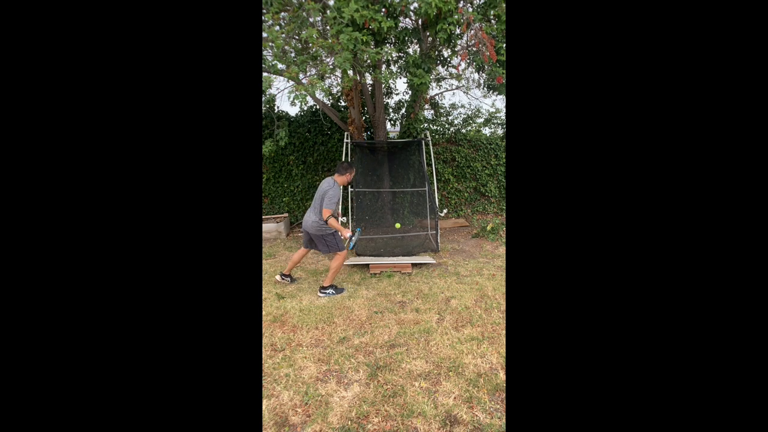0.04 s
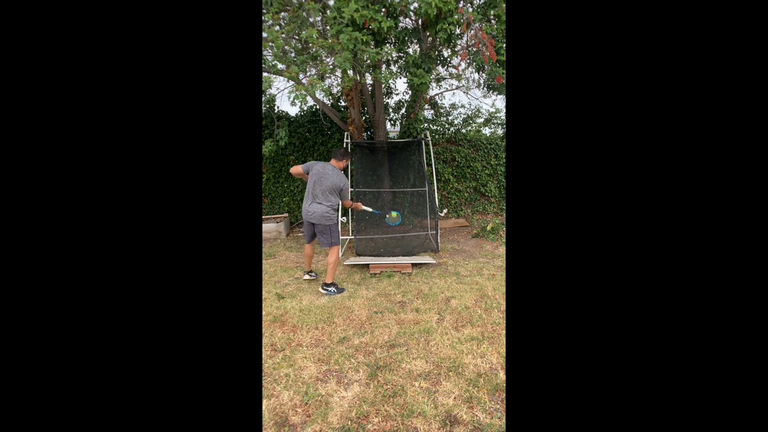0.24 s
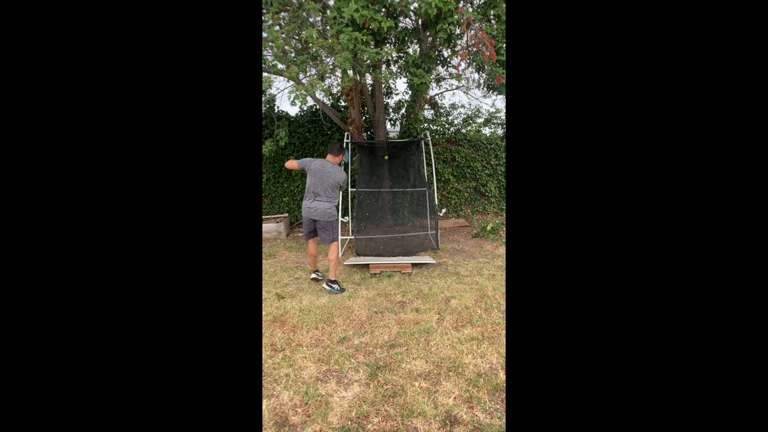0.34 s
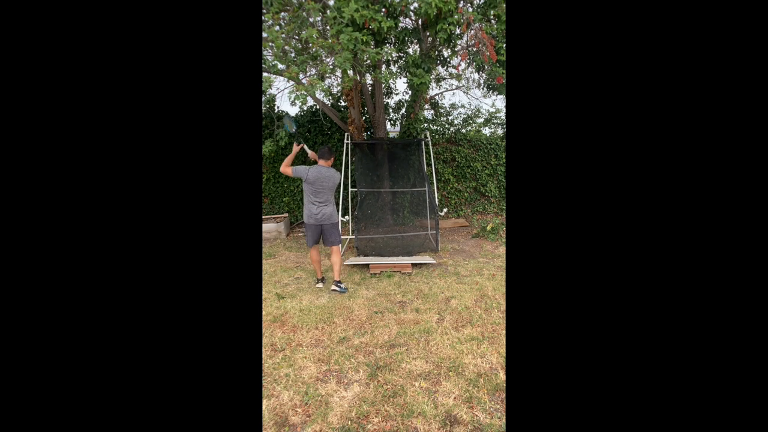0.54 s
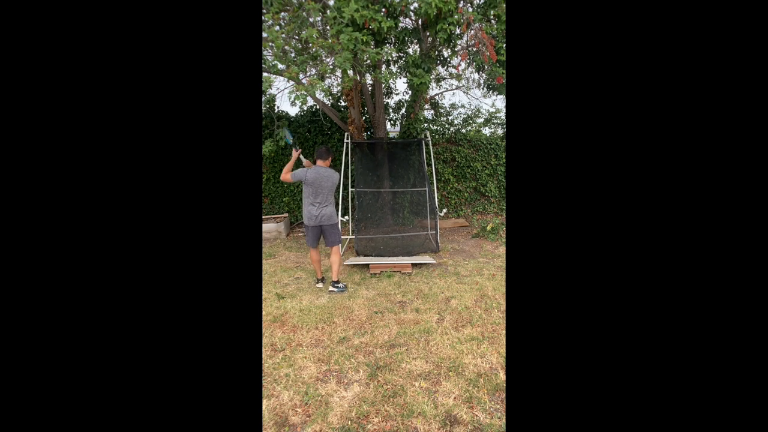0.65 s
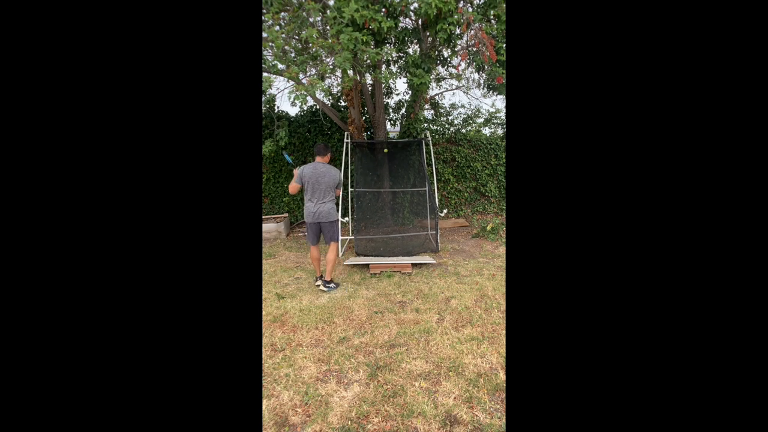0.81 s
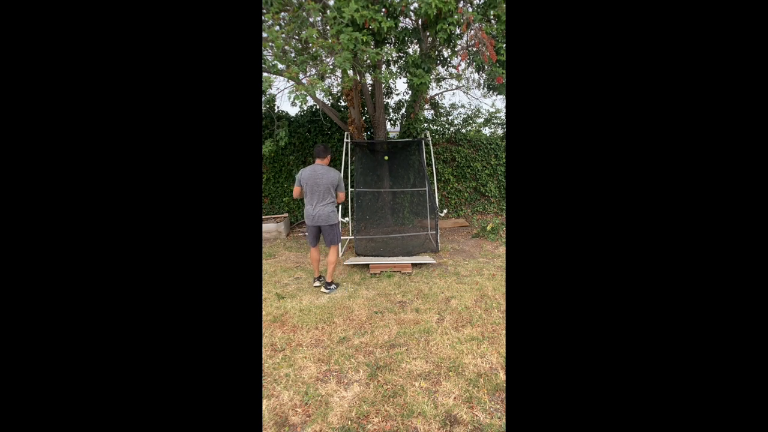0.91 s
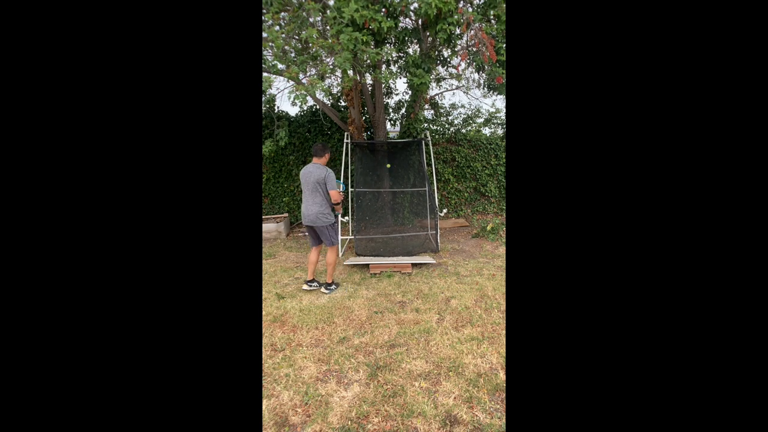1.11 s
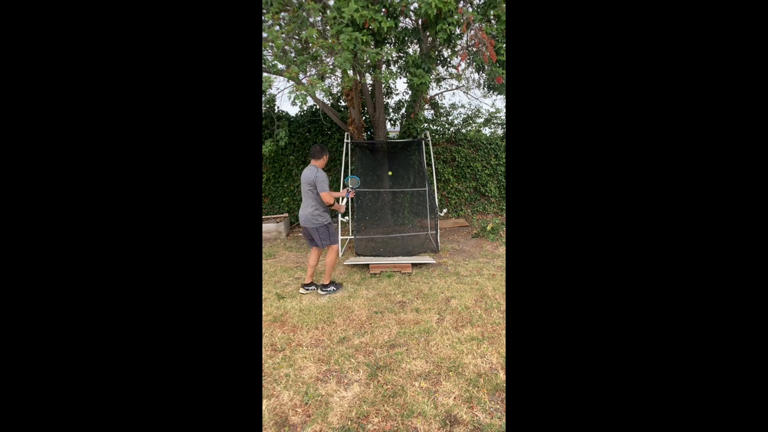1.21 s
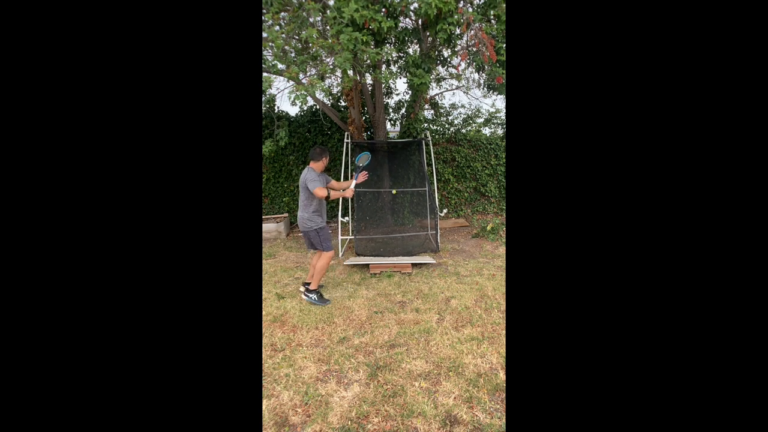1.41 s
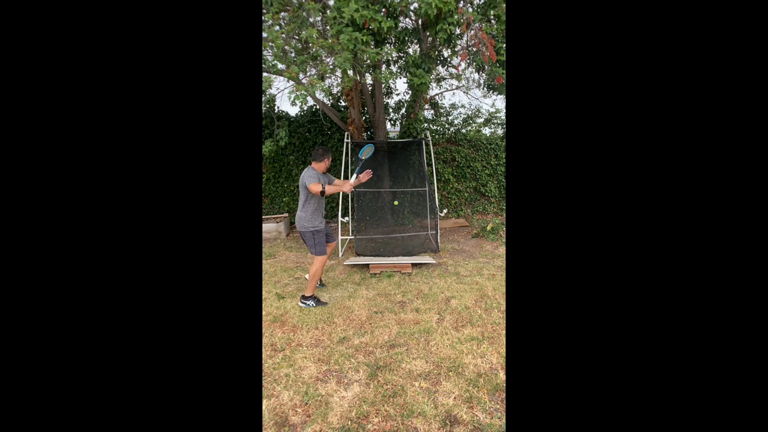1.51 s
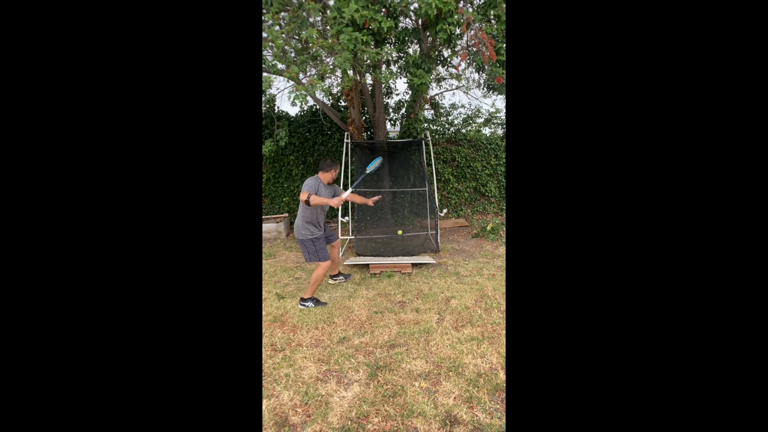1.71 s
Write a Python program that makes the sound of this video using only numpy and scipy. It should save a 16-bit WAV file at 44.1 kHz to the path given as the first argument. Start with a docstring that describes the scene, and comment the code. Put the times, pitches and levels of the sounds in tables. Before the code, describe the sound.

A racket hits a ball once with a sharp pock outdoors, over a low rumble.

```python
"""Racket stroke into a back-yard net

A ball is driven into a practice net a few metres away. The strings pock and ring;
walls, fence and ground echo the blow, hedge and tree scatter it. The net takes the ball
with a tick and a low thump. Shoes shuffle on dry grass. A steady low rumble lies
underneath; a thin, insect-like hiss comes and goes."""
import sys
import numpy as np
from scipy import signal
from scipy.fft import rfft, irfft
from scipy.io import wavfile

SR = 44100
rng = np.random.default_rng(int(sys.argv[2]) if len(sys.argv) > 2 else 0)


def store_pcm(level_fs):
    """Save levels as 16-bit WAV."""
    pcm = np.round(np.clip(level_fs, -1, 1) * 32767).astype(np.int16)
    wavfile.write(sys.argv[1], SR, np.atleast_2d(pcm).T)


N = 77175
T_S, F_HZ = np.arange(N) / SR, np.fft.rfftfreq(N, 1 / SR)
HIT_S, CRACK_S = .2025, .2032

# Stereo width: f/Hz, side over mid/dB
STEREO_WIDTH = [(60, -51.5), (400, -45), (700, -17), (1200, 1), (1800, 5.5), (2500, 2), (4400, 3),
                (6800, 5.5), (8200, -20.5), (11000, 14), (15000, -2.5)]
# Low rumble: f/Hz, relative density/dB
RUMBLE_SPECTRUM = [(15, -55), (25, -23.5), (40, -7.5), (64, -0.5), (114, 1.5), (145, -7), (212, -11),
                   (296, -6.5), (326, -7.5), (400, -11.5), (550, -13.5), (604, -10.5), (715, -15),
                   (815, -19), (947, -15.5), (1120, -31.5), (1460, -50.5), (1630, -56.5), (2200, -64),
                   (2860, -82), (4840, -120)]
# High air: f/Hz, relative density/dB
AIR_SPECTRUM = [(1000, -19), (3000, -18.5), (5500, -21), (6800, -26), (8300, 4), (9300, -18),
                (10500, -25.5), (11600, -35), (13500, -18.5), (16000, -36)]
# Thin hiss: f/Hz, relative density/dB
HISS_SPECTRUM = [(4500, -29), (5800, -19), (6600, 3), (7200, -10), (8000, 5.5), (8700, -10.5), (9300, -31),
                 (16000, -67)]
# Hiss envelope: t/s, level/dB
HISS_ENVELOPE = [(0, -83), (.06, -64.5), (.15, -59.5), (.3, -62.5), (.52, -60), (.585, -76), (.7, -100),
                 (1.1, -100), (1.2, -74), (1.31, -74.5), (1.37, -100)]
# Ball on strings: f/Hz, relative density/dB
BLOW_SPECTRUM = [(30, -39), (70, -1), (130, -4.5), (220, -1), (300, -4), (400, 3.5), (520, 7), (610, 3),
                 (700, -9.5), (800, -35), (920, -6.5), (1250, -4.5), (1500, -22.5), (1800, -17),
                 (2200, -51), (3000, -67), (16000, -91)]
# Group delay of the blow, bass last: f/Hz, delay/s
BLOW_DELAY = [(60, 0.0223), (130, 0.0142), (250, 0.01023), (500, 0.00693), (950, 0.00529), (1400, .0027),
              (3000, .002)]
# Modes of ball, strings and frame: f/Hz, level/dB, t60/s
RACKET_MODES = [(131.5, -66, .2), (175, -28.5, 0.0363), (365.6, -34.5, .17), (451.7, -38, .15),
                (526, -33.5, 0.18), (572.7, -43, 0.41), (921.7, -38, 0.13), (952.3, -18.5, 0.038),
                (971, -38, 0.195), (1031, -31.5, 0.181), (1229, -42.5, .16), (1570, -48, 0.16),
                (1695, -61, 0.12), (1745, -53, .12), (4140, -54.5, .08), (8110, -38, .018)]
# Balance of blow and modes: f/Hz, left minus right/dB
POCK_BALANCE = [(500, 0), (700, -5.7), (950, -0.8), (1300, 8.4), (1800, 0.5), (2400, 1), (4000, -1)]
# First contact: f/Hz, relative density/dB
CRACK_SPECTRUM = [(600, -25), (1500, -7), (2250, -36), (2800, -2), (3300, -7.5), (4150, -12.5), (4750, -12),
                  (5600, -54), (6700, -14.5), (7250, -12.5), (8200, 10), (8900, -13.5), (10000, -5.5),
                  (11500, -47), (13000, -18.5), (16000, -28.5)]
# Reflections off ground, fence, walls: delay/s, gain before colouring/dB, pan (+ left)
ECHO_PATHS = [(.0055, -16, .2), (.015, -18, -0.32), (0.0212, -22, 0.36), (0.0394, -14.5, -0.16),
              (0.043, -15.5, .2), (0.0533, -15, .1), (.061, -25.5, -.1), (0.07, -26.5, .1),
              (.084, -30.5, -.1), (.104, -24, .1)]
# Colouring of all reflections: f/Hz, gain/dB
ECHO_RESPONSE = [(60, -13), (170, -11), (300, 1), (500, -7.5), (750, 3.5), (980, 8.5), (1350, -11),
                 (3000, -6.5), (16000, -12)]
# Hedge and tree scatter: f/Hz, relative density/dB
SCATTER_SPECTRUM = [(50, -6.5), (150, 10.5), (550, -19.5), (740, -1.5), (950, -4), (1400, -24.5),
                    (1800, -18), (2200, -31), (3200, -30.5), (4300, -27), (5400, -33), (6700, -32),
                    (7200, -30), (8100, -15.5), (9000, -26.5), (10200, -32), (11600, -57.5), (14500, -39),
                    (16000, -42)]
# Scatter decay: f/Hz, t60/s
SCATTER_DECAY = [(100, 0.7), (500, 0.19), (950, 0.98), (2000, 0.41), (4000, 0.78), (8000, 0.32),
                 (15000, .6)]
# Net mesh: f/Hz, relative density/dB
MESH_SPECTRUM = [(1500, -28), (3500, -21.5), (5500, -28), (7200, -16.5), (7950, 0.5), (8800, -10),
                 (10200, -17.5), (11500, -37), (13000, -33), (14700, -25), (16000, -21)]
# Steps on grass: peak t/s, rise/s, level/dB, t60/s
GRASS_STEPS = [(.66, 0.07, -66.5, 0.75), (0.777, 0.037, -59, 0.48), (1.101, 0.023, -68, .3),
               (1.165, 0.03, -57.5, 0.23), (1.406, 0.013, -62, 0.55), (1.51, .08, -72.5, 0.32),
               (1.585, 0.045, -69.5, 0.23), (1.745, 0.061, -67.5, 0.38)]
# Dry blades: f/Hz, relative density/dB
GRASS_SPECTRUM = [(1000, -28.5), (2500, -32), (4400, -36), (5300, -48), (6500, -15.5), (7200, -14),
                  (8200, 4), (9000, -7.5), (10200, -13.5), (11600, -33), (13300, -23), (16000, -27)]
# Sole and clothing scuffs: peak t/s, rise/s, level/dB, t60/s, centre f/Hz, width/oct
SCUFF_EVENTS = [(.597, .003, -63, 0.046, 4190, 0.054), (0.596, 0.0061, -74, 0.074, 1690, 0.22),
                (0.784, .035, -68, 0.26, 3980, 0.45), (0.782, 0.029, -73, 0.086, 1573, 0.21),
                (1.004, 0.0022, -62, 0.019, 8270, 0.09), (1.14, .012, -76.5, .08, 4400, .25),
                (1.152, 0.026, -56.5, .2, 880, 0.14), (1.17, 0.039, -69, .22, 14160, 0.19),
                (1.37, 0.017, -55, 0.17, 934, .1)]


def amp(db):
    """dB to gain."""
    return 10 ** (np.asarray(db) / 20)


def unit_rms(x):
    """Scale to rms 1."""
    return x / np.sqrt(np.mean(x ** 2) + 1e-20)


def curve(points, at_hz=F_HZ):
    """Interpolate a table over log frequency."""
    hz, value = np.transpose(points)
    return np.interp(np.log(at_hz + 1), np.log(hz + 1), value)


def noise(shape_db):
    """Shaped stereo noise, rms 1: mono bass, wide treble."""
    mid, side = rfft(rng.standard_normal((2, N))) * amp(shape_db)
    side = side * amp(curve(STEREO_WIDTH))
    return unit_rms(irfft(np.array([mid + side, mid - side]), N))


def swell(peak_s, rise_s, t60_s):
    """Gaussian rise, exponential fall."""
    age_s = T_S - peak_s
    return np.exp(-(np.minimum(age_s, 0) / rise_s) ** 2) * amp(-60 * np.maximum(age_s, 0) / t60_s)


def ripple_db(depth_db=3.2, spacing_hz=130, above_hz=1400):
    """Many small resonances: random spectral peaks and dips."""
    knots_hz = np.arange(0, SR / 2, spacing_hz)
    return depth_db * np.interp(F_HZ, knots_hz, rng.standard_normal(len(knots_hz))) * (F_HZ > above_hz)


def rumble(level_db=-51.5, split_hz=390, flutter_db=2.36, flutter_hz=18, fade_db_per_s=1.5):
    """Low rumble: the bass wavers, the upper band slowly fades."""
    flutter = unit_rms(irfft(rfft(rng.standard_normal(N)) * (F_HZ < flutter_hz), N))
    wash = amp(level_db) * noise(curve(RUMBLE_SPECTRUM))
    bass = irfft(rfft(wash) / (1 + (F_HZ / split_hz) ** 4), N)
    upper = (wash - bass) * amp(.5 - fade_db_per_s * T_S)
    return bass * unit_rms(amp(flutter_db * flutter)) + upper


def air(level_db=-77):
    """Faint, steady high noise."""
    return amp(level_db) * noise(curve(AIR_SPECTRUM))


def hiss():
    """Insect-like hiss that comes and goes."""
    level_db = np.interp(T_S, *np.transpose(HISS_ENVELOPE))
    return amp(level_db) * noise(curve(HISS_SPECTRUM))


def pock(blow_db=-24):
    """The ball's blow falls fast in pitch; ball, strings and frame ring."""
    delay_s = curve(BLOW_DELAY)
    phase_rad = -2 * np.pi * np.cumsum(HIT_S + delay_s) * SR / N
    blow = irfft(amp(curve(BLOW_SPECTRUM)) * np.exp(1j * phase_rad), N)
    out = amp(blow_db) * blow / np.linalg.norm(blow) * np.sqrt(SR / 30)  # level as rms over 1/30 s
    for hz, db, t60_s in RACKET_MODES:
        peak_s = HIT_S + np.interp(hz, F_HZ, delay_s)
        out += amp(db) * swell(peak_s, 1 / hz, t60_s) * np.sin(2 * np.pi * hz * (T_S - peak_s))
    balance = amp(np.array([[.5], [-.5]]) * curve(POCK_BALANCE))
    return irfft(rfft(out) * balance, N)


def crack(level_db=-32, slide_s=.0025, t60_s=.006):
    """Bright burst while the ball slides on the strings."""
    contact = (T_S > CRACK_S) * amp(-60 * np.maximum(T_S - CRACK_S - slide_s, 0) / t60_s)
    return amp(level_db) * contact * noise(curve(CRACK_SPECTRUM))


def echoes(hit):
    """Single reflections around the yard; their bass stays centred."""
    response, width = 0, amp(curve(STEREO_WIDTH))
    for delay_s, db, pan in ECHO_PATHS:
        balance = 1 + np.array([[pan], [-pan]]) * 2 * width
        response += amp(db) * np.exp(-2j * np.pi * F_HZ * delay_s) * balance
    return irfft(rfft(hit) * response * amp(curve(ECHO_RESPONSE)), N)


def scatter(level_db=-35.5, rise_s=.006):
    """Diffuse tail off hedge and tree; each band decays at its own rate."""
    hz, t_s, bands = signal.stft(noise(curve(SCATTER_SPECTRUM) + ripple_db()), SR, nperseg=512)
    decay = amp(-60 * np.maximum(t_s - HIT_S, 0) / curve(SCATTER_DECAY, hz)[:, None])
    tail = signal.istft(bands * decay, SR, nperseg=512)[1][:, :N]
    return amp(level_db) * np.clip((T_S - CRACK_S) / rise_s, 0, 1) * tail


def net_mesh(at_s=.286, tick_db=-42, rustle_db=-55):
    """The ball ticks on the mesh, which rustles on."""
    tick = amp(tick_db) * swell(at_s + .0016, rise_s=.003, t60_s=.069)
    rustle = amp(rustle_db) * swell(at_s + .035, rise_s=.012, t60_s=.87)
    return (tick + rustle) * noise(curve(MESH_SPECTRUM) + ripple_db())


def net_thump(at_s=.292, hz=60, level_db=-35, rise_s=.0078, t60_s=.12):
    """The net swings with a low thump."""
    return amp(level_db) * swell(at_s + rise_s, rise_s, t60_s) * np.cos(2 * np.pi * hz * (T_S - at_s))


def steps(snaps_per_s=290, snap_over_bed_db=-.5, snap_t60_s=.0072):
    """Dry grass underfoot: single blades snap over a bed of rustle."""
    envelope = sum(amp(db) * swell(peak_s, rise_s, t60_s) for peak_s, rise_s, db, t60_s in GRASS_STEPS)
    impulses = (rng.random(N) < snaps_per_s / SR) * rng.uniform(.2, 1, N)
    snaps = signal.lfilter([1], [1, -amp(-60 / (snap_t60_s * SR))], impulses)
    crackle = unit_rms(1 + amp(snap_over_bed_db) * snaps)
    return envelope * crackle * noise(curve(GRASS_SPECTRUM))


def scuffs(skirt_db=-36.5):
    """Soles and clothing rub and tap: narrow noise bands on broad skirts."""
    out = 0
    for peak_s, rise_s, db, t60_s, centre_hz, width_oct in SCUFF_EVENTS:
        offset_oct = np.log2((F_HZ + 1) / centre_hz)
        band_db = np.maximum(-4 * (offset_oct / width_oct) ** 2, skirt_db - 6 * offset_oct ** 2)
        out += amp(db) * swell(peak_s, rise_s, t60_s) * noise(band_db + ripple_db())
    return out


def scene():
    """Yard, stroke, reflections, net, feet."""
    yard = rumble() + air() + hiss()
    hit = pock() + crack()
    return yard + hit + echoes(hit) + scatter() + net_mesh() + net_thump() + steps() + scuffs()


def record(dry, low_cut_hz=28, high_cut_hz=15780):
    """Low cut and band limit."""
    highpass = signal.butter(2, low_cut_hz, "highpass", fs=SR, output="sos")
    lowpass = signal.firwin(511, high_cut_hz, window=("kaiser", 9), fs=SR)
    return signal.oaconvolve(signal.sosfilt(highpass, dry), lowpass[None], "same")


dry = scene()
out = record(dry)
store_pcm(out)
```